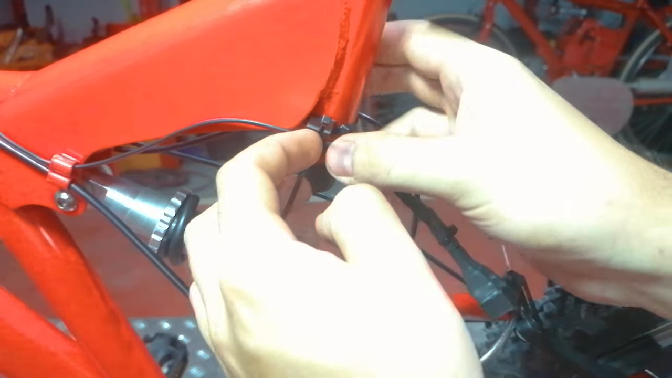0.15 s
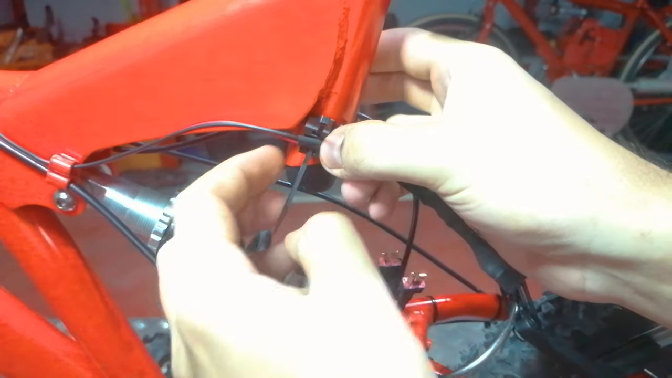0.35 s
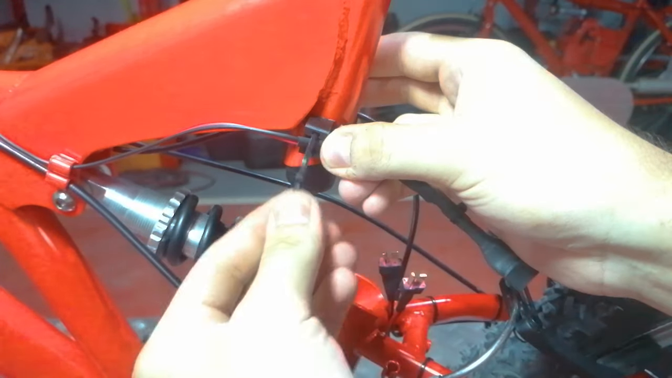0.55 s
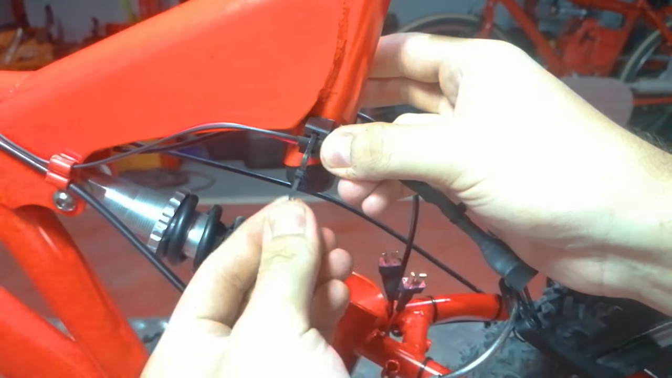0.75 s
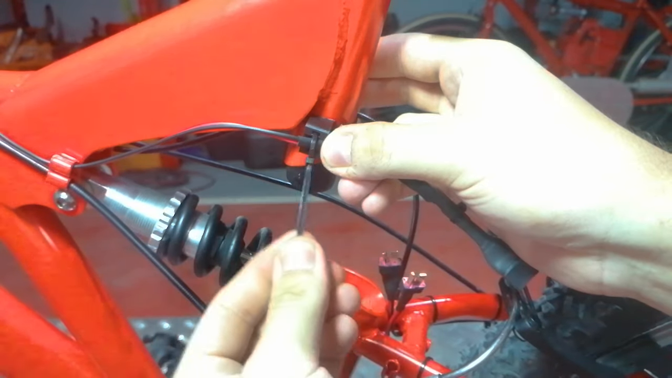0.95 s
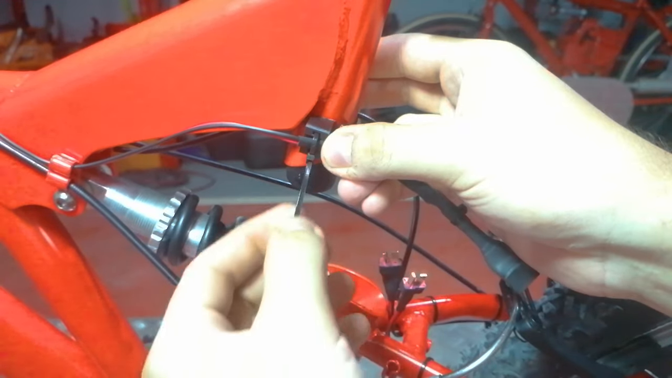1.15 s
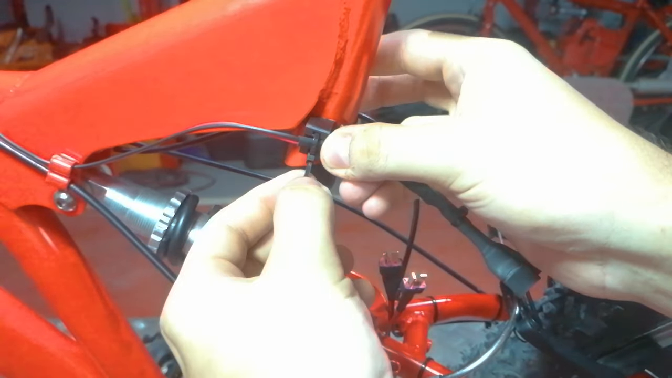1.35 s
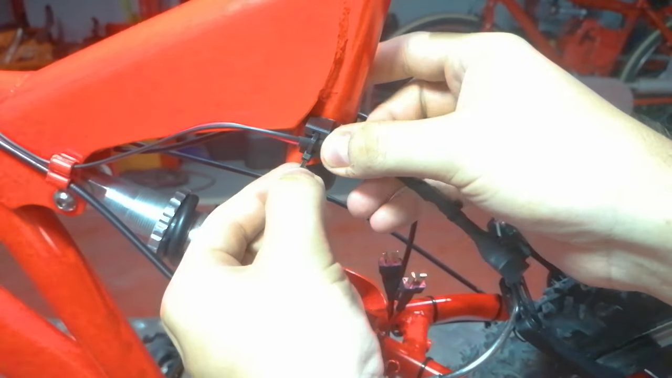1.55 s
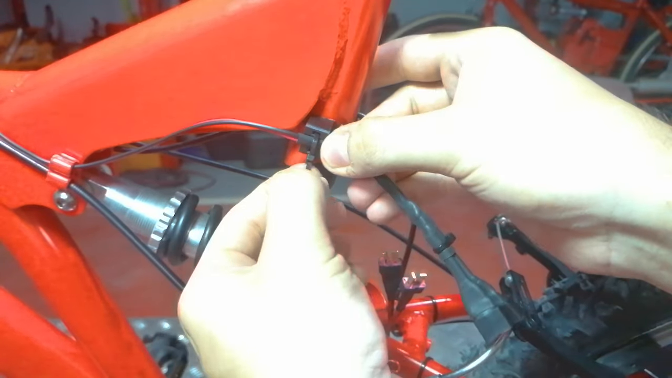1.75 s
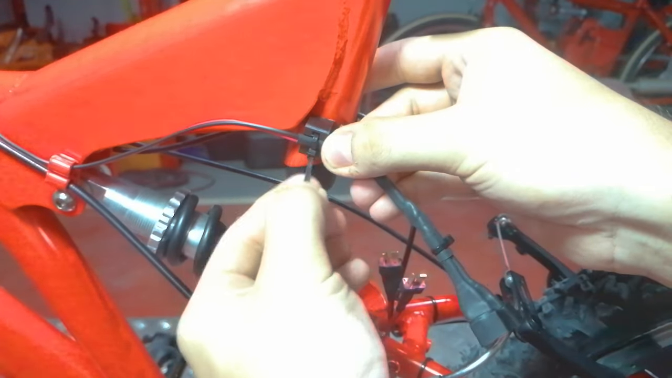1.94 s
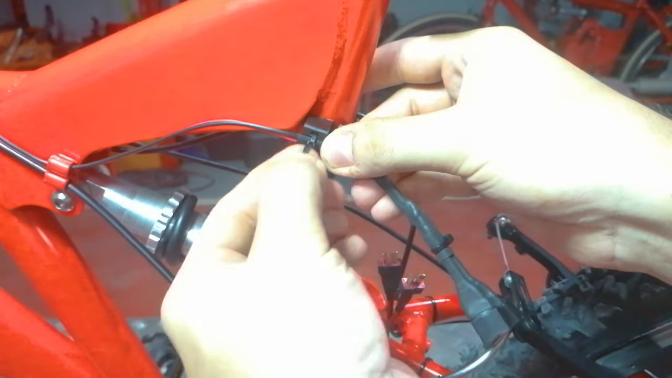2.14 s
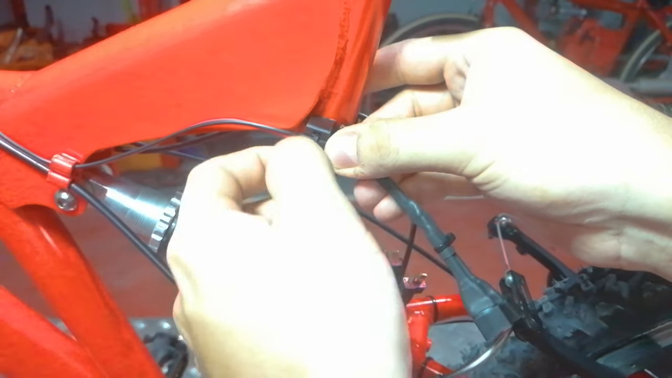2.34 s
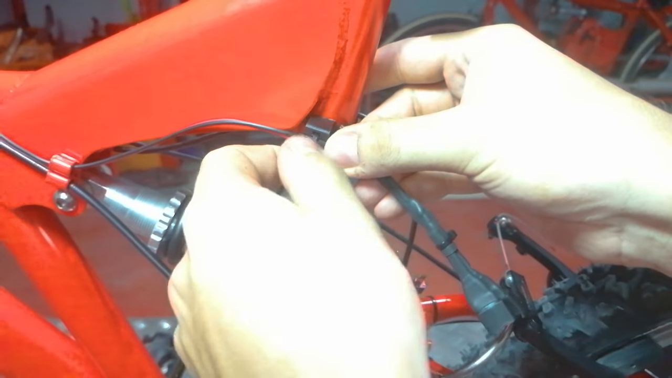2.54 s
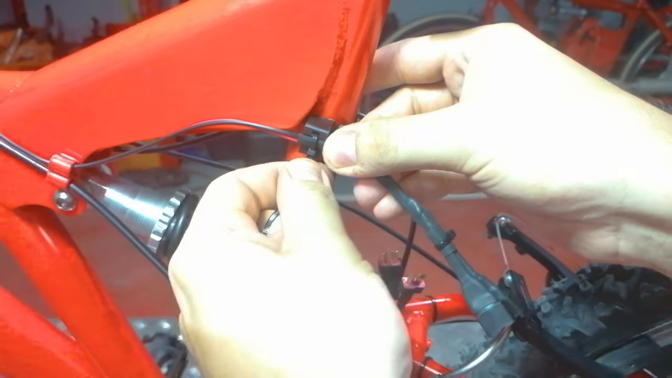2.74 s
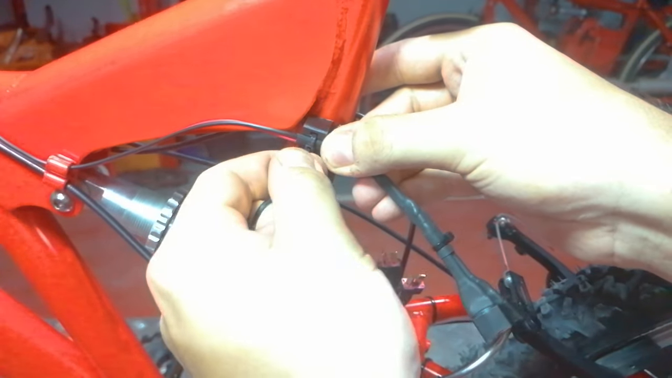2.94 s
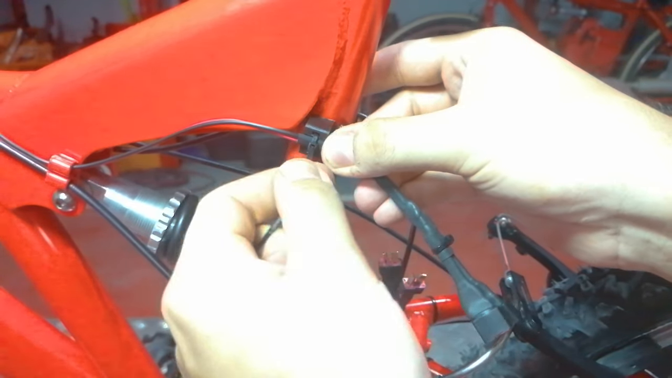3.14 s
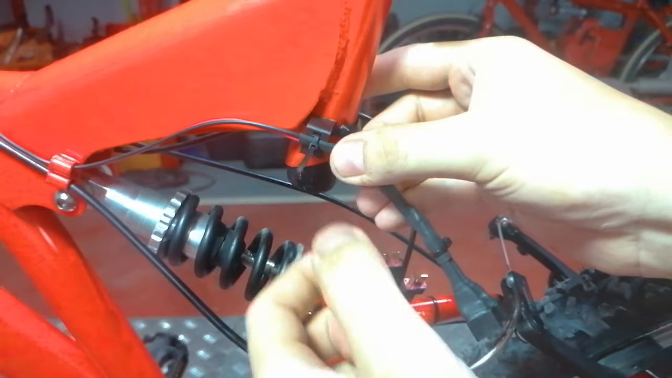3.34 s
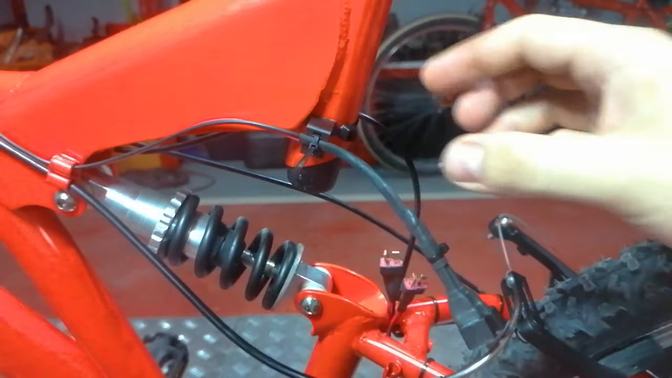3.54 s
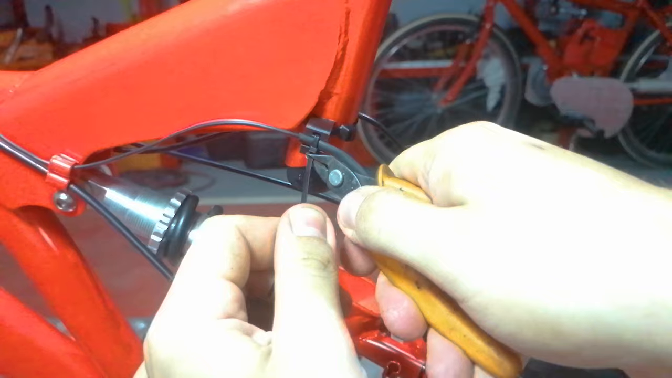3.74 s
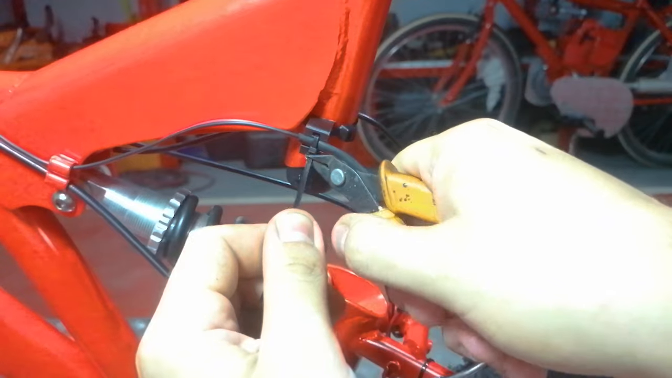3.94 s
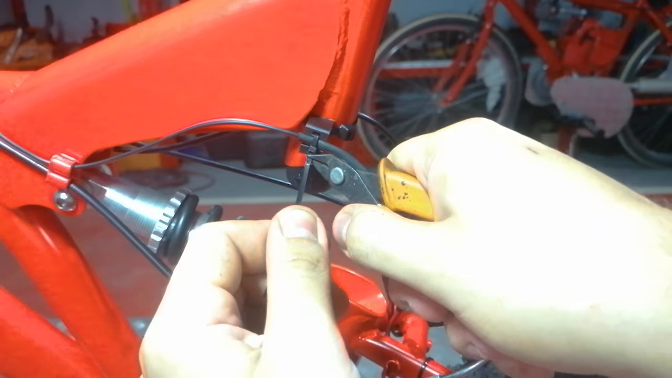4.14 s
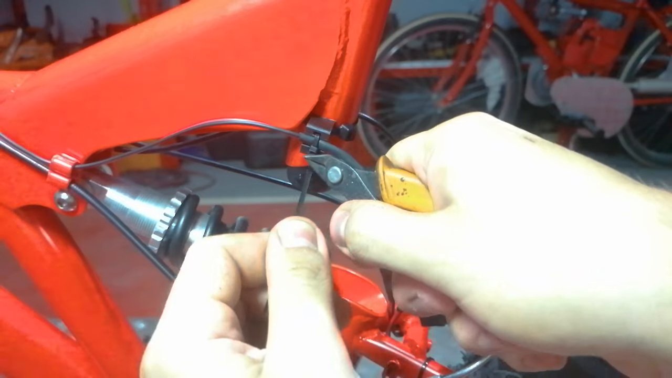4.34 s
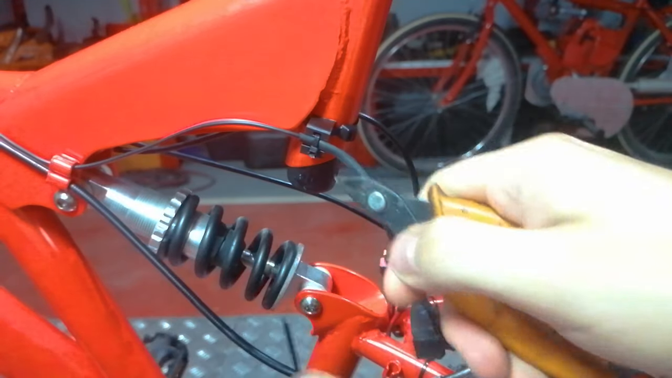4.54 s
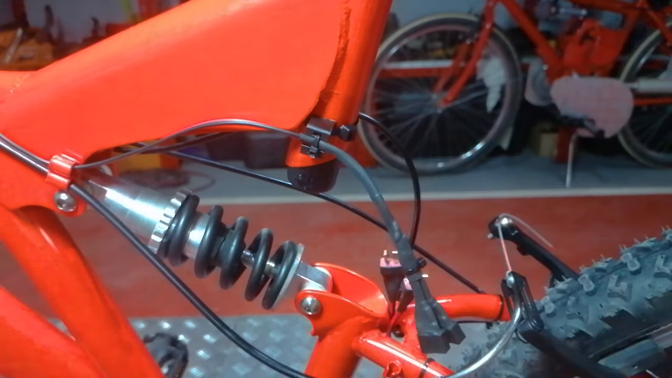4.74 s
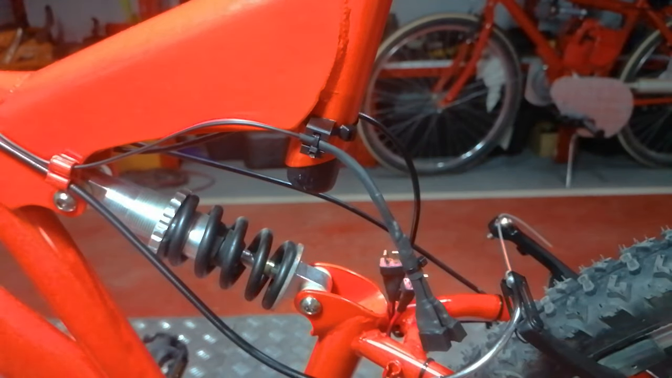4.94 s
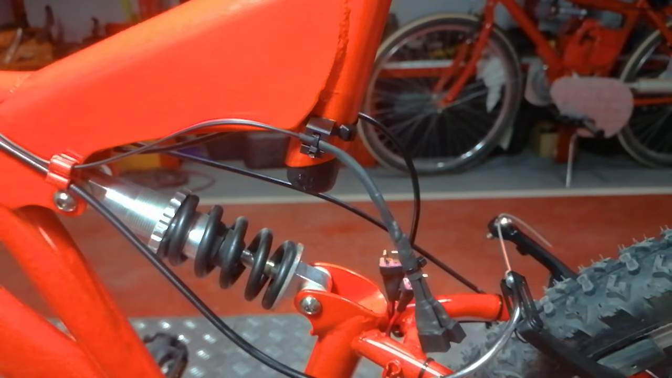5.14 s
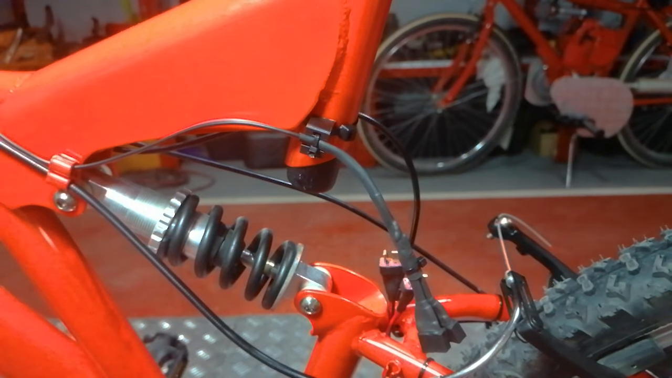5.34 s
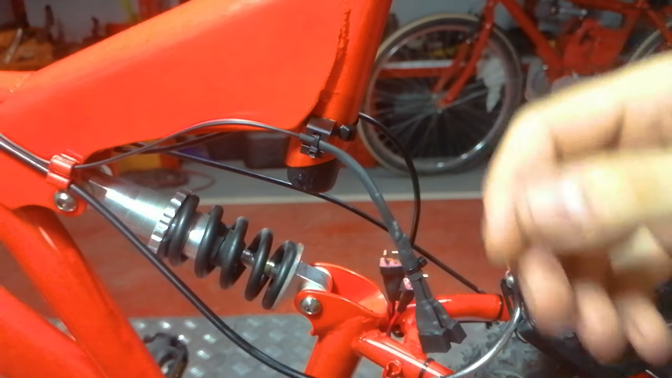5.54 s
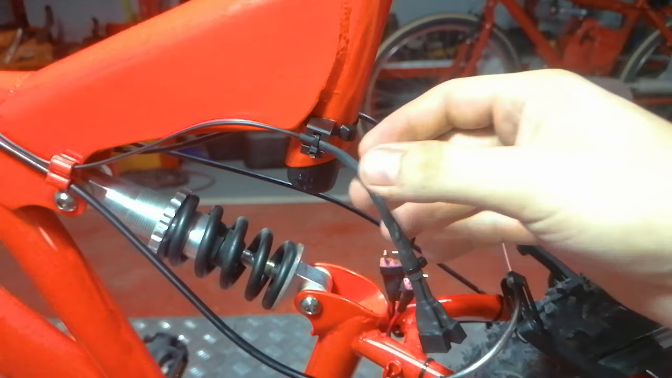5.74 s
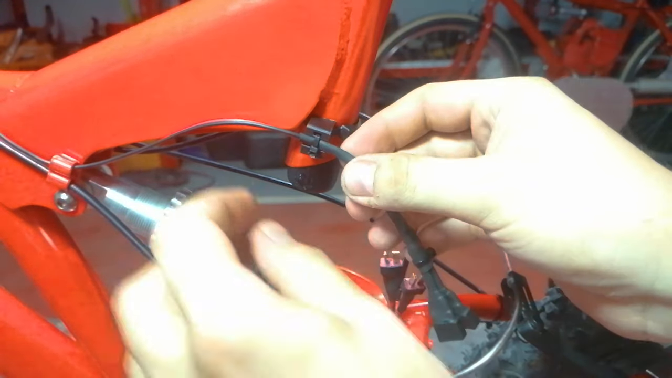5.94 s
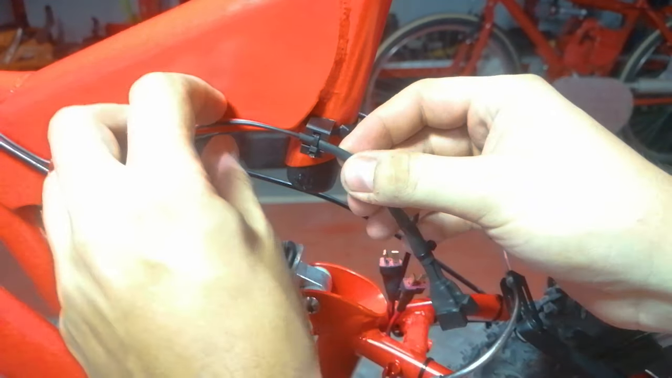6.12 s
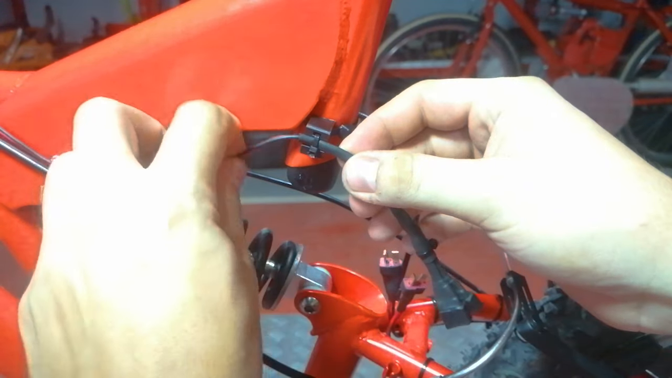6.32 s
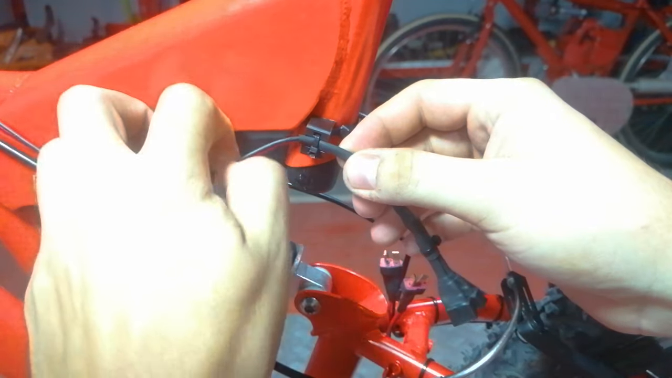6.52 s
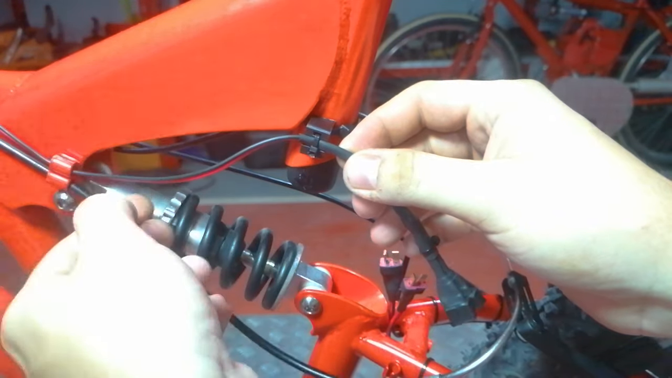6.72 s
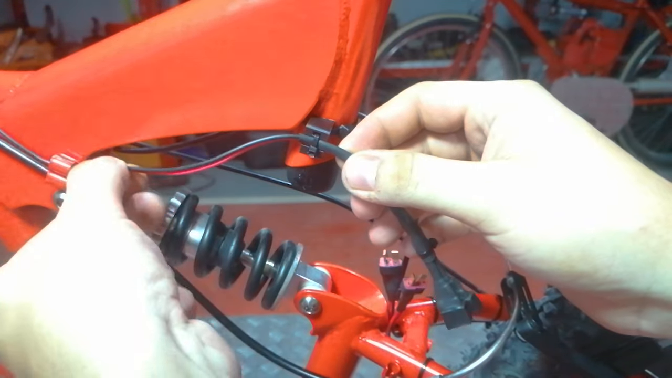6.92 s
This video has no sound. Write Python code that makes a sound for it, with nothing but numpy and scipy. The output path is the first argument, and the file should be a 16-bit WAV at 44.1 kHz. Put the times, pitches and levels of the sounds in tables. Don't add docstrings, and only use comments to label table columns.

```python
import sys
import numpy as np
from scipy import signal
from scipy.io import wavfile
from scipy.ndimage import uniform_filter1d

SR = 44100
rng = np.random.default_rng(int(sys.argv[2]) if len(sys.argv) > 2 else 0)


def bounce(signal):
    frames = np.transpose(np.atleast_2d(signal))
    limited = np.clip(frames, -1, 1)
    pcm = np.round(limited * 32767).astype(np.int16)
    wavfile.write(sys.argv[1], SR, pcm)


N = 312126

# frequency in Hz, level in dB per Hz.
HISS = [(20, -6), (60, -15.5), (105, -23.5), (150, -10.5), (230, -2.5), (300, -9), (800, -7), (2200, -8.5),
        (3300, -11), (4500, -15), (9000, -21), (11900, -28.5), (12150, -21.5), (15900, -24), (16200, -47.5)]
HISS_DB, PATCH_DB = -73.5, 0.9
# frequency in Hz, side minus mid in dB.
SIDE_DB = [(60, -17.5), (180, -25.5), (550, -22.5), (1650, -35.5), (4970, -17.5), (15000, -9)]
# centre in
# seconds, length in seconds, depth in dB (swells below 0), upper edge in Hz.
DENTS = [(1.9, 2.6, -5, 260.4), (5.609, 0.13, 1.5, 2600), (1.38, 0.27, -2.5, 4550),
         (1.084, 0.056, -11, 423.5), (1.562, 0.28, -2.5, 380), (4.869, 0.31, -6.5, 422.4),
         (0.574, 0.091, 4.5, 3030), (0.707, 0.13, 3.5, 3008), (0.963, 0.049, 5, 1810),
         (1.554, 0.015, 8, 16000), (1.923, 0.12, 2.5, 1800), (2.081, 0.05, 4.5, 3494),
         (2.32, 0.013, 3, 16400), (2.883, 0.016, 7, 11100), (2.994, 0.011, 8, 15900),
         (4.091, 0.025, 6.5, 11100), (4.515, 0.092, 7, 2950), (4.925, 0.027, 5.5, 16040),
         (5.496, 0.083, 3, 5010), (5.344, 0.015, 8, 5000), (6.493, 0.098, 7, 15970),
         (6.86, 0.017, 6, 16100)]

FAN_HZ = [145.5, 288, 431]
FAN_DB = [-83, -85.5, -84]
FLUTTER_DB = 2.5
# frequency in Hz, level in dB.
STRAYS = [(369, -85.5), (576, -96), (800, -89.5), (861, -91)]
# centre in seconds, length in seconds, line in Hz, change in dB.
LINE_SWELLS = [(0.444, 0.21, 145, 6.5), (0.6, 0.15, 145, -16), (0.767, 0.11, 145, 9), (0.897, 0.11, 145, -11),
               (1.057, 0.19, 145, 12.5), (1.353, .08, 145, 10.5), (1.66, 0.29, 145, 5), (1.922, 0.16, 145, -9),
               (2.344, 0.35, 830, 6.5), (4.438, 0.074, 145, 10), (4.664, 0.12, 145, 7), (5.097, 0.37, 145, 8.5),
               (6.198, 0.13, 145, 6), (1.106, 0.17, 281, 10.5), (1.32, 0.25, 800, 8.5), (1.556, 0.16, 281, 20),
               (2.405, 0.79, 145, 1.5), (2.698, .15, 281, 7), (4.85, .09, 281, 16.5), (5.002, 0.24, 281, 8.5),
               (5.299, 0.24, 281, 10), (.7, .3, 431, 4), (1.63, 0.092, 431, 7), (2.205, 0.11, 431, 16),
               (2.307, 0.095, 431, 10), (2.447, 0.057, 431, 16.5), (2.551, .06, 431, 10.5),
               (2.657, 0.07, 431, 13.5), (2.785, .13, 431, 13), (2.078, 0.098, 431, -10),
               (2.887, 0.036, 431, -12), (1.09, .07, 369, 12), (1.37, 0.059, 369, 9), (1.98, 0.072, 369, 7),
               (2.83, 0.065, 369, 7), (1.695, .08, 281, 10), (3.385, 0.21, 431, 4), (4.433, 0.039, 431, 14.5),
               (5.452, 0.099, 431, 19), (6.205, 0.25, 431, 5.5), (6.938, 0.091, 431, 5.5)]

# frequency in Hz, t60 in seconds.
ROOM_T60 = [(300, 0.46), (1000, 0.2584), (2000, 1), (3500, 0.58), (6000, .29), (10000, 0.41),
            (16000, 0.1988)]
# frequency in Hz, extra fall in dB per second.
KNEE_FALL = [(300, 295.5), (1800, 204.5), (3000, 251), (4000, 147), (6500, 63), (16000, 80.5)]
# frequency in Hz, width in Hz, share removed.
HOLLOWS = [(2920, 192, 0.62), (9530, 500, 0.85), (4350, 303.4, .3)]
SKEW_DB = -33
# frequency in Hz, level in dB.
SKEW = [(500, -5.5), (2000, -2), (5000, 5), (15000, 6)]
TOP_HZ, TOP_LEAK_DB = 15830, -26

# start in seconds, frequency in Hz, level in dB.
SETTLE = [(5.533, 2300, -60), (5.558, 1590, -58.5), (5.575, 2430, -63), (5.612, 2120, -59),
          (5.641, 1880, -59), (5.665, 2290, -66)]
# start in seconds, steel level in dB, brightness in dB per octave, handle level in dB.
BOUNCES = [(5.2998, -27.5, 7.5, -63), (5.3023, -31, 6, -67), (5.3122, -44, 0, -73), (5.3298, -16.5, 7, -44),
           (5.3305, -10, 2.5, -36), (5.3357, -24, -4, -51), (5.3403, -28, 0, -48), (5.3486, -30, 5, -34),
           (5.36, -23, -2, -35), (5.3682, -20.5, 0, -46), (5.37, -19.5, -1, -44), (5.378, -17.5, -2.5, -25),
           (5.388, -36, 6, -47), (5.401, -24, 0, -51), (5.4252, -28, -2, -34.5), (5.4385, -24.5, -3.5, -54),
           (5.453, -38, 3, -51), (5.5333, -58, 0, -55), (5.6117, -62.5, -8, -60)]
# frequency in Hz, level in dB.
STEEL = [(3000, -58), (4000, -13), (5000, -10), (6500, -0.5), (8000, 3), (9500, -2.5), (13000, -12.5),
         (16000, -20)]
# frequency in Hz, width in Hz, level in dB.
STEEL_RING = [(6950, 330, -30), (7900, 110, -6), (8780, 330, -11), (11400, 410, -13), (13700, 300, -11)]
# frequency in Hz, level in dB.
HANDLE = [(1200, -16.5), (2200, -7.5), (3000, -1.5), (4300, -1.5), (5500, -1), (6500, -20.5)]
# start in seconds, knock in dB, low boards share in dB, high boards share in dB.
KNOCKS = [(5.2982, -39.5, -7, -9), (5.3045, -44, -5, -8), (5.3125, -46.5, -5, 21), (5.322, -34.5, -8, -11),
          (5.3285, -30, -1, 1), (5.3373, -35.5, -7, -7), (5.347, -43, -2, 0), (5.358, -40, -3, 8),
          (5.3696, -32, 4, 9), (5.377, -40, 4, 2), (5.385, -33, 11, 1.5), (5.391, -41.5, 10, 3),
          (5.404, -45, -3, 0), (5.416, -54, 4, 7), (5.43, -49, -1, -7), (5.441, -55, 3, -6),
          (5.455, -57.5, 4, 1), (5.47, -65, 2, -5), (5.483, -72, 6, -12), (5.502, -68.5, -2, -12)]
# frequency in Hz, width in Hz, level in dB.
BENCH = [(255, 57, -17), (316, 41, -16.5), (424, 24, -2.5), (541, 64, -0.5), (645, 39, -4.5),
         (673, 19.3, 2.5), (731, 31, -11), (800, 19, -6), (888, 240, -5), (1060, 170, -15),
         (1132, 43, -3.5), (1350, 160, -5.5), (1490, 74, -7), (1880, 160, -26)]
THUD_HZ, THUD_WIDTH, THUD_DB = 753, 690, -2

SNIP_S, SNIP_DB = 4.3712, -1
CLASH_S, CLASH_DB = 0.0013, -2
# frequency in Hz, level in dB.
SNIP = [(500, -65.5), (900, -38), (1200, -26), (1800, -22), (2600, -18.5), (4000, -12.5), (5300, -7),
        (6200, -0.5), (9000, -8.5), (11500, -7.5), (14500, -7.5), (16000, -15)]
# frequency in Hz, level in dB.
SNIP_NEAR = [(500, 14.5), (1200, -14), (2000, -20), (3600, -12), (5000, -6), (5900, 3), (8000, 2.5),
             (16000, 0)]
# frequency in Hz, width in Hz, level in dB.
JAWS = [(4170, 230, -18), (4750, 360, -14.5), (5550, 240, -6.5), (6040, 210, 0), (6660, 220, -3.5),
        (7000, 228, -6.5), (7540, 280, -8), (8215, 200, -4.5), (9194, 260, -6.5), (10420, 352, -6.5),
        (11240, 351, -8), (12350, 400, -12.5), (14104, 505, -6)]
# frequency in Hz, width in Hz, level in dB.
ARMS = [(950, 120, -27.5), (1160, 150.6, -17.5), (1840, 130, -15.5), (2500, 160, -9.5), (3200, 180, -5),
        (3772, 150, -7), (4020, 160, -6), (4804, 220, -0.5)]
# frequency in Hz, level in dB, t60 in seconds.
TUBE = [(1080, -13.5, .1), (1353, -14.5, 0.35), (1730, -12.5, 0.61), (1815, -4, 0.23), (2017, -7.5, 0.4015),
        (2220, -12, 0.53), (2470, -12, 0.36), (3209, -6, 0.2984), (3280, -8.5, .3), (4200, -6, 0.35)]

# start in seconds, pawl snap in dB,
# strap share in dB, neck share in dB, head share in dB.
LOOSE_TEETH = [(0.5428, -40.0, -23.0, -20, -16), (0.559, -37.5, -4.5, -20, -23.0),
               (0.572, -37, 2.5, -15, -15.5), (0.659, -35, -34, -26.0, -15),
               (0.6645, -34.5, -27.0, -23, -7), (0.6705, -35, -22.0, -11, -5), (0.6782, -36, -17, -11, 0),
               (0.688, -45, -3, 7, 2), (0.698, -40, -3.5, 1.5, -2), (0.719, -43.5, 0, 2.5, -5),
               (1.0176, -39.0, -7, -15, -8), (1.0229, -44, 5, 1, 4), (1.027, -40, -9, -2, 0),
               (1.0322, -34.5, 3, -7, -1), (1.0375, -39, 7, -3, -3.0), (1.0425, -37.5, 9.5, -1.0, -6),
               (1.0482, -33, 3, -1.0, -2), (1.0535, -34.5, 8, -4, -3), (1.0598, -32.5, 7.0, 2, -2),
               (1.067, -37.5, 11.5, -2, -2), (1.0794, -37, 8, -4, -7), (1.1035, -35.5, 7, -4, -5.5),
               (1.2234, -55, -9.0, -11, -17)]
# start in seconds, pawl snap in dB,
# strap share in dB, neck share in dB, head share in dB.
FAST_TEETH = [(0.895, -64, 27, 17, -8), (0.8968, -62, 26, 5, -8), (0.8995, -54, 15, -4, -16),
              (0.9015, -45, 11, -3, -20), (0.9037, -40, 3, 4, -15), (0.906, -39, 6, 3, -11),
              (0.9082, -39, 5, 3, -6), (0.9107, -38, 3, 2, -6), (0.9126, -45, -1, -6, -10),
              (0.9145, -39, 5, -4, -7), (0.9166, -36.5, -2, -4, 3), (0.9184, -38, -3, -1, 1),
              (0.9207, -36, -3, -5, 3), (0.9227, -40, -4, 2, 3), (0.9256, -37, -4, 2, 2),
              (0.9272, -41, -2, 2, 2), (0.9289, -43, 4, 11, 6), (0.9303, -42, -4, 0, 3),
              (0.9318, -48, -4, 3, 3), (0.9341, -43, 0, 11, 11)]
# start in seconds, pawl snap in dB,
# strap share in dB, neck share in dB, head share in dB.
TIGHT_TEETH = [(1.887, -52.0, 7, -3, -12.0), (1.8998, -46.0, 10, 7.5, -2), (1.911, -42.5, 5.5, 5, 3),
               (1.9204, -40.5, 4, 2.0, -5), (1.9287, -32, -3, -6, -7), (1.9425, -33.5, 1, -8, -17),
               (2.047, -41.5, 7.5, -6, -11), (2.0527, -38, 6.5, 2, -4.5), (2.0577, -40.5, -6, -8, 0),
               (2.0615, -58, 5, -4, -4), (2.8799, -61, -16.0, -19.0, -17.0), (4.086, -46, -28, -41, -33)]
FAST_DAMPING, TIGHT_DAMPING = 2.6, 0.74
# start in seconds, time until taut in seconds,
# frame level when taut in dB, low tube share in dB, high tube share in dB.
PULLS = [
    (.54, 0.044, -69, -5, -2),
    (.655, 0.044, -79, -5, 0),
    (0.896, 0.018, -38.5, -18, -13),
    (1.014, 0.043, -42.5, 0.5, -3),
    (1.885, 0.048, -41.5, -14, 11.5),
    (2.045, 0.016, -63.5, -8, 22.5),
]
SLACK_DB, EASE_PER_S = -77, 5.6
# frequency in Hz, width in Hz, level in dB.
STRAP = [(4860, 240, -20), (5050, 260, -13.5), (5600, 240, -9.5), (6050, 214, 0), (6620, 200, -5.5)]
# frequency in Hz, width in Hz, level in dB.
STRAP_LOOSE = [(4860, 250, -19), (5180, 320, -7), (5720, 260, -1), (5970, 230, 0), (6550, 300, -18)]
# frequency in Hz, width in Hz, level in dB.
STRAP_GRIPPED = [(4830, 270, -18), (5370, 250, -10), (5680, 140, -7.5), (6080, 460, 2), (6600, 230, -7)]
# frequency in Hz, width in Hz, level in dB.
NECK = [(7120, 550, 3), (7535, 160, -6)]
# frequency in Hz, width in Hz, level in dB.
HEAD = [(8270, 340, -2), (9050, 310, -1)]
# frequency in Hz, width in Hz, level in dB.
CATCH = [(10180, 460, 0.5), (10850, 300, -1.5), (11400, 590, 0.5), (12270, 440, -5)]
# frequency in Hz, width in Hz, level in dB.
PAWL = [(12700, 700, -10), (14300, 1100, 4), (15300, 600, -5)]
CATCH_DB, CATCH_HEAD, CATCH_TAUT_DB = -14, 0.39, 11
CLICK_HZ, CLICK_WIDTH, CLICK_DB = 9800, 5000, 0
SPLINTER_S = 0.006
STRAP_FAR_DB = -5
FAST_FAR_DB = -1.5
LOOSE_S, LOOSE_RISE = 0.8, 0.045
GRIP_S, GRIP_FRAME_DB = 1.5, -1.5
# frequency in Hz, width in Hz, level in dB.
GRIP_CABLE = (2660, 240, -2.4)
FRAME_HZ, FRAME_WIDTH, FAR_SPREAD = 3220, 150, 2.2
# frequency in Hz, width in Hz, level in dB.
FRAME_SIDE = [(1470, 250, -13), (1960, 330, -6), (2480, 170, -13.5), (3544, 270, -4), (3670, 240, -14),
              (4470, 480, -2.5)]


def gain_of(db):
    return 10 ** (np.asarray(db) / 20)


def evened(x):
    return x / np.sqrt(np.mean(x ** 2) + 1e-20)


def peaked(x):
    return x / abs(x).max(-1, keepdims=True)


def read(points, hz):
    f, value = np.transpose(points)
    return np.interp(np.log(hz + 1), np.log(f + 1), value)


def add(mix, s, sound):
    part = mix[:, round(s * SR):][:, :sound.shape[1]]
    part += sound[:, :part.shape[1]]


def swell_around(t, s, length):
    return np.exp(-(2 * (t - s) / length) ** 4)


def ring(x, hz, width):
    return signal.lfilter(*signal.iirpeak(min(hz, SR * 0.45), hz / max(width, 1), fs=SR), x)


def modal_ring(blow, modes, onset, width):
    out = 0
    for k, (hz, w, db) in enumerate(modes):
        out = out + (-1) ** k * gain_of(db) * peaked(ring(ring(blow, hz, onset * w), hz, width * w))
    return out


def colour(x, points):
    size = 2048
    log_gain = np.log(gain_of(np.maximum(read(points, abs(np.fft.fftfreq(size, 1 / SR))), -100)))
    taps = np.fft.ifft(np.exp(np.conj(signal.hilbert(log_gain)))).real[:size // 2]
    taps = np.reshape(taps, (1,) * (x.ndim - 1) + (-1,))
    return signal.fftconvolve(x, taps, axes=-1)[..., :x.shape[-1]]


def blow_of(t60, tick, length=0.03):
    t = np.arange(round(length * SR)) / SR
    impulse = 1.0 * (t == 0)
    splinter = rng.standard_normal(len(t)) * gain_of(-60 * t / t60)
    return np.array([splinter + tick * impulse, impulse])


def hiss():
    frames, hz = N // 128 + 5, np.fft.rfftfreq(512, 1 / SR)[:, None]
    a, b, c, d, patches = rng.standard_normal((frames, 257, 5)).T
    patches = evened(uniform_filter1d(uniform_filter1d(patches, size=6, axis=0), size=16, axis=1))
    t = np.arange(frames) * 128 / SR
    dent_db = sum(db * swell_around(t, s, w) / (1 + (hz / top_hz) ** 4) for s, w, db, top_hz in DENTS)
    shape = gain_of(read(HISS, hz) + PATCH_DB * patches - dent_db)
    side_shape = shape * gain_of(read(SIDE_DB, hz) + 4.0)
    z = np.array([(a + 1j * b) * shape, (c + 1j * d) * side_shape])
    noise = evened(signal.istft(z, nperseg=512, noverlap=384)[1][:, :N])
    mid, side = gain_of(HISS_DB) * noise * np.sqrt(0.5)
    return np.array([mid + side, mid - side]) * np.sqrt(2)


def fan():
    t, out = np.arange(N // 64 + 1) * 64 / SR, np.zeros(N)
    fine_t = np.arange(N) / SR
    for hz, db in [*zip(FAN_HZ, FAN_DB), *STRAYS]:
        waver, flutter = uniform_filter1d(rng.standard_normal((2, len(t))), size=50)
        flutter = evened(uniform_filter1d(flutter, size=12))
        lift_db = sum(lift * swell_around(t, s, w) for s, w, at_hz, lift in LINE_SWELLS if abs(at_hz - hz) < hz / 10)
        gain = np.interp(fine_t, t, gain_of(db + lift_db + FLUTTER_DB * flutter))
        pitch = np.interp(fine_t, t, hz + 4.57 * evened(waver))
        out += np.sqrt(2) * gain * np.sin(2 * np.pi * np.cumsum(pitch) / SR)
    return out


def room(x, wet_db, knee_s, haste, step_db):
    near, far = x
    hz, t, z = signal.stft(rng.standard_normal(SR // 2), SR, nperseg=128)
    late = np.maximum(t - knee_s, 0)
    fall_db = 60 * t / read(ROOM_T60, hz)[:, None]
    fall_db = fall_db + haste * read(KNEE_FALL, hz)[:, None] * late + step_db * np.tanh(late / 0.011)
    tail = signal.istft(z * gain_of(-fall_db), SR, nperseg=128)[1]
    tail *= 1 - np.exp(-np.arange(len(tail)) / (0.00354 * SR))
    lag = round(0.0016 * SR)
    echo = np.append(np.zeros(lag), near[:-lag])
    return near - 0.21 * echo + gain_of(wet_db) * signal.oaconvolve(far, tail / np.linalg.norm(tail))[:N]


def suppressed(x):
    hz, t, z = signal.stft(x, SR, nperseg=512, noverlap=384)
    power = uniform_filter1d(uniform_filter1d(abs(z) ** 2, size=7, axis=0), size=7, axis=1)
    learnt = gain_of(read(HISS, hz) + HISS_DB - 14.5)[:, None] ** 2
    keep = np.clip(1 - learnt / (power + 1e-20), 0, 1) ** 2.45
    return signal.istft(z * keep, SR, nperseg=512, noverlap=384)[1][:N]


def settle():
    out = np.zeros((2, N))
    for s, hz, db in SETTLE:
        add(out, s, gain_of(db) * peaked(ring(ring(blow_of(0.012, tick=3.1), hz, 800), hz, 540)))
    return out


def bench_knocks():
    bench = np.zeros((2, N))
    for s, knock_db, low_db, high_db in KNOCKS:
        thump = blow_of(0.0022, tick=4.8, length=0.12)
        boards = np.zeros_like(thump)
        for k, (hz, w, db) in enumerate(BENCH):
            board_db = db + low_db * (hz < 500) + high_db * (hz > 950)
            board = ring(ring(thump, hz, 6 * w), hz, 1.04 * w) / np.sqrt(w)
            boards += (-1) ** k * gain_of(board_db) * board
        thud = thump
        for _ in range(3):
            thud = ring(thud, THUD_HZ, THUD_WIDTH)
        swell = 1 - np.exp(-np.arange(boards.shape[1]) / (0.0018 * SR))
        slap = gain_of(THUD_DB + high_db / 2) * peaked(thud)
        add(bench, s, gain_of(knock_db) * (peaked(boards) * swell + slap))
    return bench


def steel_bounces():
    steel = np.zeros((2, N))
    for s, steel_db, tilt_db, handle_db in BOUNCES:
        tilted = [(hz, db + tilt_db * np.log2(hz / 7000)) for hz, db in STEEL]
        blow = blow_of(0.0081, tick=2.8)
        rings = sum(gain_of(db) * peaked(ring(blow, hz, w)) for hz, w, db in STEEL_RING)
        add(steel, s, gain_of(steel_db - 1.0) * (peaked(colour(blow, tilted)) + gain_of(-19) * peaked(rings)))
        add(steel, s, gain_of(handle_db + 4.5) * peaked(colour(blow, HANDLE)))
    return steel


def tube():
    t, out = np.arange(round(0.16 * SR)) / SR, np.zeros((1, N))
    modes = 0
    for hz, db, t60 in TUBE:
        decay = gain_of(db - 60 * t / np.clip(t60, 0.05, 0.6))
        modes = modes + decay * np.sin(2 * np.pi * (hz * t + rng.random()))
    swell, cut = 1 - np.exp(-t / 0.0082), 1 + (t / 0.098) ** 16
    add(out, SNIP_S, gain_of(-42) * (modes * swell / cut)[None])
    return out[0]


def snip():
    blow, out = blow_of(0.004, tick=3.7), np.zeros((2, N))
    blow[0, round(CLASH_S * SR)] += 5 * gain_of(CLASH_DB)
    jaws = modal_ring(blow, JAWS, onset=6, width=0.97)
    arms = modal_ring(blow[1], ARMS, onset=4, width=1)
    add(out[:1], SNIP_S, gain_of(-24.5) * peaked(arms)[None])
    crack = peaked(colour(blow, SNIP))
    crack = np.array([colour(crack[0], SNIP_NEAR), crack[1]])
    snap = gain_of([[-5], [0]]) * crack + gain_of([[-1.5], [-16]]) * peaked(jaws)
    add(out, SNIP_S, gain_of(SNIP_DB) * snap)
    return out


def tension(s):
    begun = [p for p in PULLS if p[0] <= s + 0.003]
    start, rise, taut_db, *shares = max(begun, key=lambda p: p[0])
    pull = np.clip(min((s - start) / rise, 1 - EASE_PER_S * (s - start - rise)), 0, 1)
    return pull, SLACK_DB + pull * (taut_db - SLACK_DB), *shares


def frame_ring(s):
    shake, gripped = blow_of(0.018, tick=3.3, length=0.025), s > GRIP_S
    pull, frame_db, low_db, high_db = tension(s)
    modes = [(FRAME_HZ, FRAME_WIDTH, GRIP_FRAME_DB * gripped), *FRAME_SIDE]
    if gripped:
        modes.append(GRIP_CABLE)
    out = np.zeros_like(shake)
    for hz, w, db in modes:
        level_db = frame_db + db + pull * (low_db * (hz < 2350) + high_db * (hz > 4050))
        steep = ring(ring(shake, hz, 1.9 * w), hz, 1.9 * w)
        rung = np.array([ring(steep[0], hz, 1.7 * w), ring(steep[1], hz, FAR_SPREAD * w)])
        out += gain_of(level_db - np.array([[4.8], [9.5]])) * peaked(rung)
    return out


def chord(blow, modes, damping, shift=1):
    out = 0
    for k, (hz, w, db) in enumerate(modes):
        hz = hz * shift
        steep = ring(ring(blow, hz, 4 * w * damping), hz, 4 * w * damping)
        rung = np.array([ring(steep[0], hz, w * damping), ring(steep[1], hz, 3 * w)])
        out = out + (-1) ** k * gain_of(db) * rung / w
    return peaked(out)


def tooth(s, damping, pawl_db, strap_share, neck_share, head_share):
    blow, loose = blow_of(SPLINTER_S, tick=3.7, length=0.025), s < LOOSE_S
    strap = STRAP_LOOSE if loose else STRAP_GRIPPED if s > GRIP_S else STRAP
    catch_db = CATCH_DB + CATCH_HEAD * head_share + CATCH_TAUT_DB * tension(s)[0]
    out = chord(blow, PAWL, damping)
    out += gain_of(catch_db) * chord(blow, CATCH, damping)
    out += gain_of(head_share) * chord(blow, HEAD, damping)
    out += gain_of([[strap_share], [strap_share + STRAP_FAR_DB]]) * chord(blow, strap, damping)
    out += gain_of(neck_share) * chord(blow, NECK, damping, 1 + LOOSE_RISE * loose)
    click = ring(ring(blow[1], CLICK_HZ, CLICK_WIDTH), CLICK_HZ, CLICK_WIDTH)
    out[0] += gain_of(catch_db + CLICK_DB) * peaked(click)
    far_db = FAST_FAR_DB * (damping == FAST_DAMPING)
    return out * gain_of(pawl_db - 0.5 + np.array([[0], [far_db]]))


def tie():
    out = np.zeros((3, N))
    for teeth, damping in (LOOSE_TEETH, 1), (FAST_TEETH, FAST_DAMPING), (TIGHT_TEETH, TIGHT_DAMPING):
        for s, *levels in teeth:
            near, far = tooth(s, damping, *levels)
            frame_near, frame_far = frame_ring(s)
            add(out, s - 0.0005, np.array([near + frame_near, far, frame_far]))
    return out


def scene():
    close, far, frame = tie()
    near = room((close, far), -5.5, knee_s=0.023, haste=0.6, step_db=10.5)
    near += room((0 * frame, frame), -2, knee_s=0.036, haste=0.8, step_db=6)
    near += room(snip(), 2.68, knee_s=0.083, haste=1.52, step_db=2) + tube()
    near += room(steel_bounces() + settle(), 0.46, knee_s=0.023, haste=1.75, step_db=3.5)
    near += room(bench_knocks(), -2, knee_s=0.055, haste=2.6, step_db=7)
    near = signal.lfilter(*signal.butter(2, 170, "high", fs=SR), near)
    for hz, width, share in HOLLOWS:
        near = near - share * ring(near, hz, width)
    near = suppressed(near)
    skew = gain_of(SKEW_DB) * np.roll(colour(near, SKEW), 37)
    return near + np.array([skew, -skew]) + fan() + hiss()


def roll_off(x):
    return signal.sosfilt(signal.butter(12, 17140, fs=SR, output="sos"), x)


def record(dry):
    edge = signal.firwin(255, TOP_HZ, fs=SR)
    leak = signal.firwin(255, [TOP_HZ, 17000], pass_zero=False, fs=SR)
    edge = edge + gain_of(TOP_LEAK_DB) * leak
    mix = signal.oaconvolve(dry, edge[None], "same")
    return roll_off(mix)


dry = scene()
out = record(dry)
bounce(out)
```